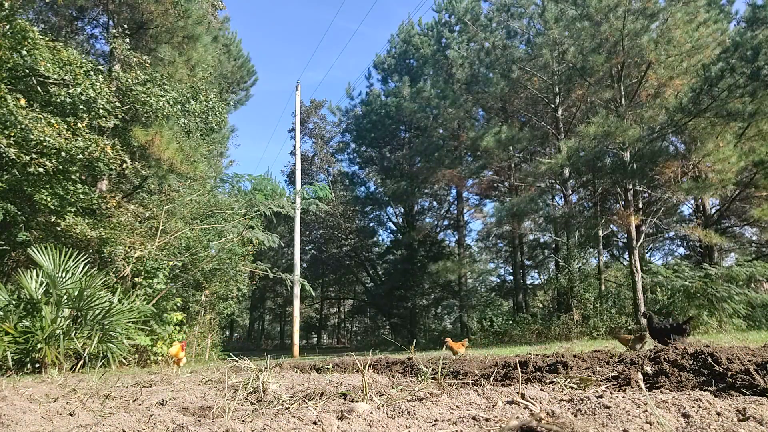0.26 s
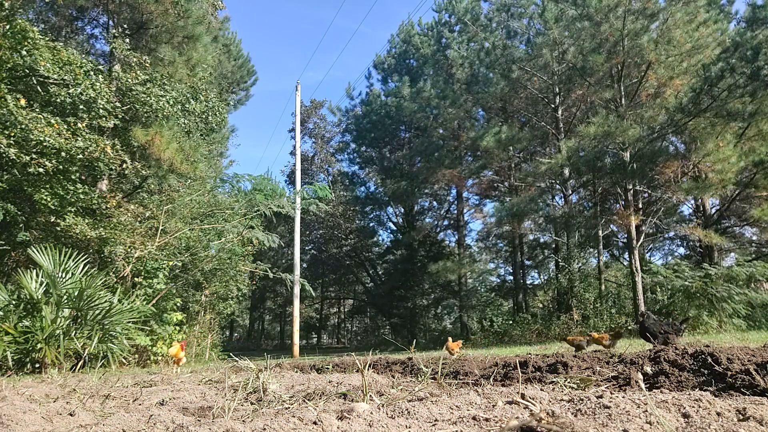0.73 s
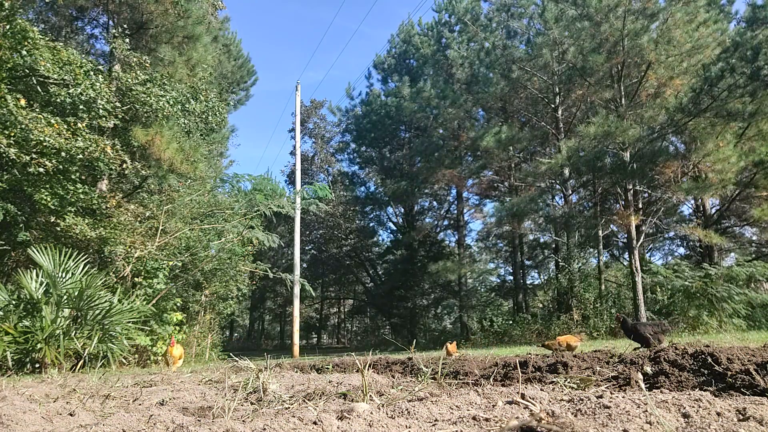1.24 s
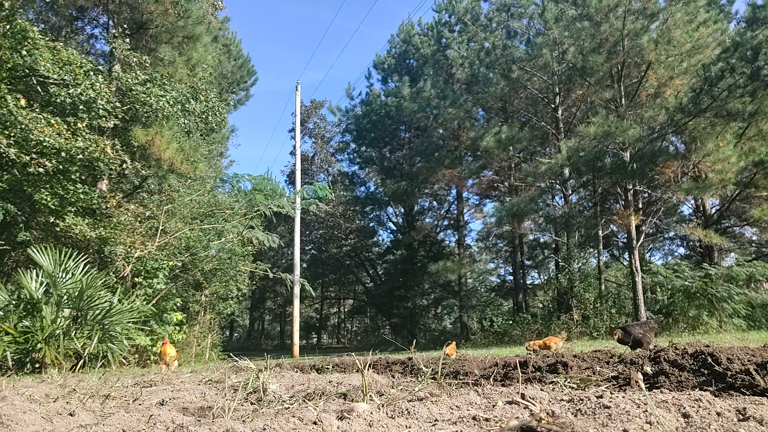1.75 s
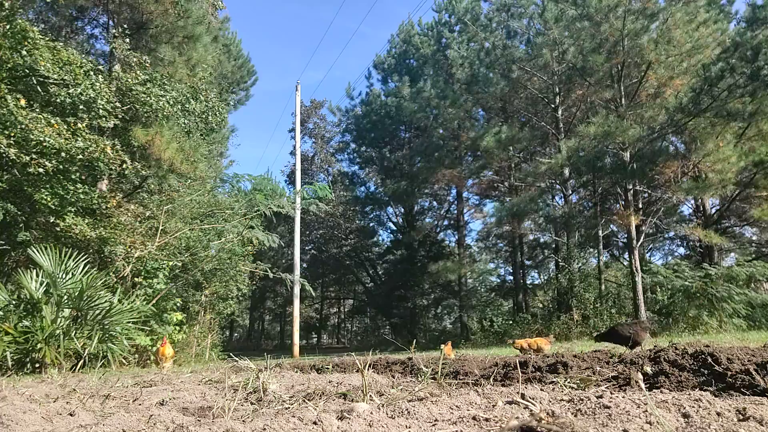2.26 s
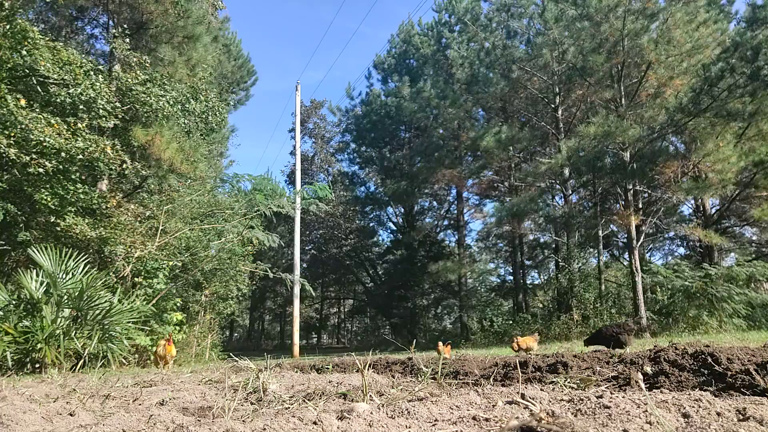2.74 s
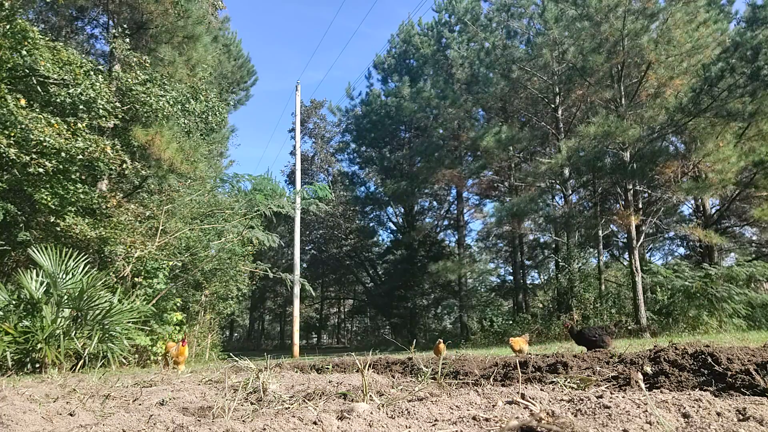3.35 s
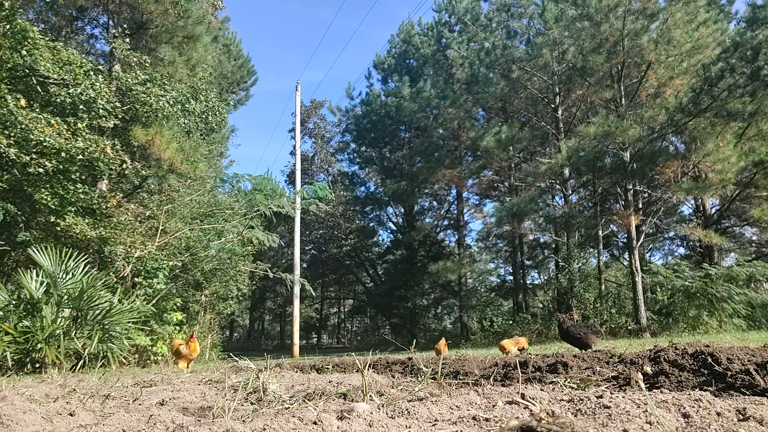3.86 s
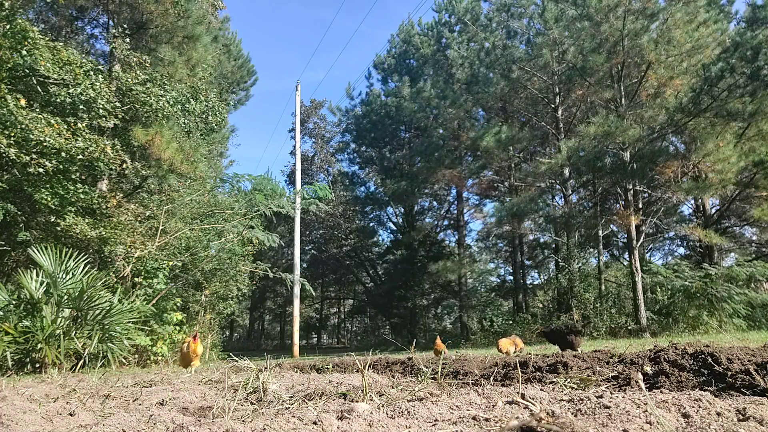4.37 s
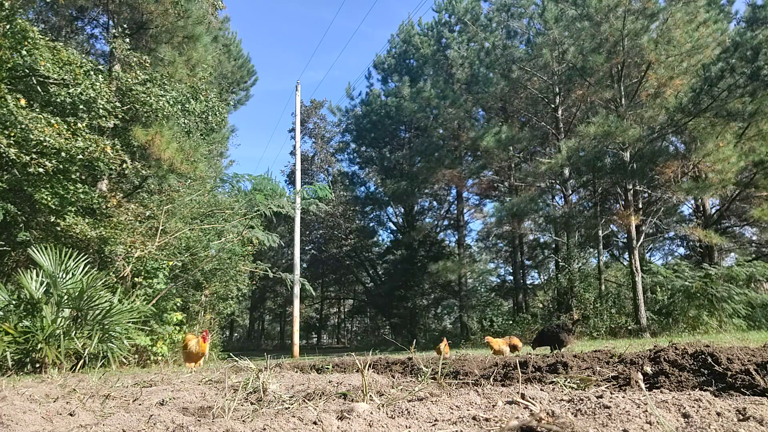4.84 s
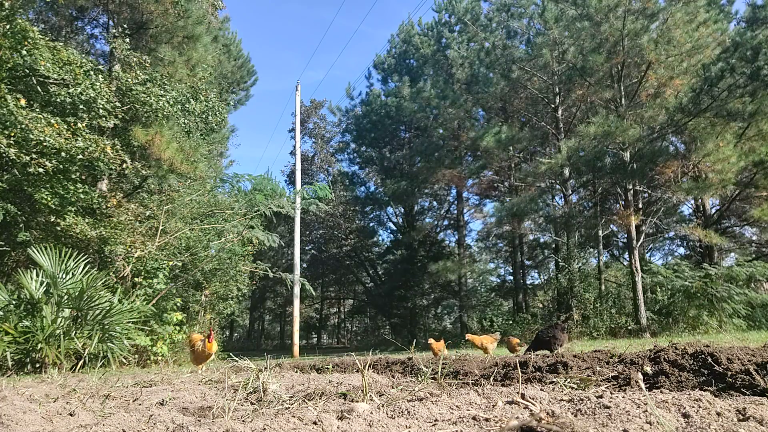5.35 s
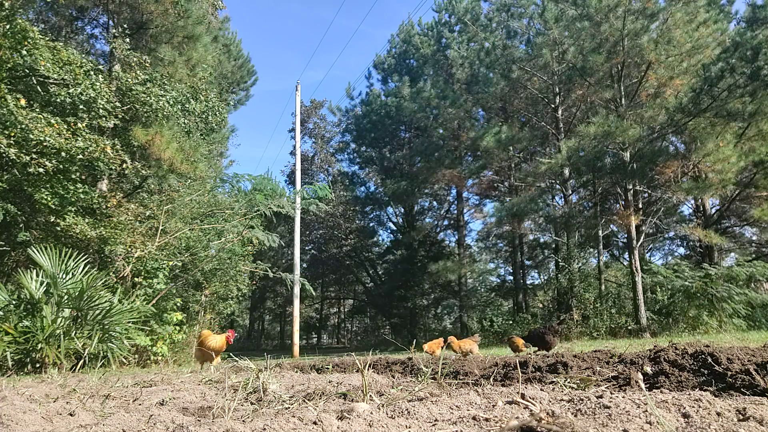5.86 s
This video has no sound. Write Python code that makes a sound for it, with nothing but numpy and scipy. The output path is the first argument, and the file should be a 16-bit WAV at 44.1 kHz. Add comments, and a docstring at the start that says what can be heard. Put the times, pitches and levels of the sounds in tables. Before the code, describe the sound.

A single-cylinder petrol tiller is already running at 0 s, close to a low stereo microphone outdoors. About thirty firings a second make a fast, throaty putter, each thud edged by a spit of bright hiss. Valves tick, the cooling fan rushes briefly, tines grind soil, and loose metal jingles in irregular bursts, strongest around 0.5 and 1.2-1.5 s. The speed hunts slightly up and down, and by 2 s the hiss has eased as the machine moves off. Around 2.95-3.15 s dull tine knocks sound and the muffler swings away: speed rises a little, the note becomes rounder, and hiss drops sharply. From 3.6 to 4.3 s it is darkest, with rattling nearly hidden. Around 4.6 s the engine strains with more throttle, brightness partly returns, and from 5 s it digs in with a fuller, rougher growl, one faint clink near 5.4 s, continuing to 6 s. Treble leans right.

```python
"""Garden tiller turning away, close by

A single-cylinder four-stroke tiller works the soil, heard near the ground on a microphone with two ports.
Each firing sends gas pulses through the muffler as a thud and a spit of hiss; low puffs follow. The valves tick,
the fan rushes, the tines churn and loose metal jingles. The speed hunts as the machine moves off; at about three
seconds tines knock and the muffler swings away: the note turns rounder, the hiss sinks, then the engine digs in."""
import sys
import numpy as np
from scipy import signal
from scipy.fft import rfft, irfft
from scipy.io import wavfile
from scipy.ndimage import uniform_filter1d

SR = 44100
rng = np.random.default_rng(int(sys.argv[2]) if len(sys.argv) > 2 else 0)


def generate_wav(sig):
    """Save sig (samples, or channels by samples) to the path in sys.argv[1] as 16-bit PCM at SR."""
    pcm = np.round(np.clip(np.atleast_2d(sig).T, -1, 1) * 32767).astype(np.int16)
    wavfile.write(sys.argv[1], SR, pcm)


N = 269010
TIME = np.arange(N) / SR  # s
BINS = np.fft.rfftfreq(N, 1 / SR)  # Hz

# Engine speed, hunting round the governor's setting until the turn frees the tines: time_s, firings_per_s
SPEED = [(0.0, 30.468), (0.49, 30.605), (0.66, 31.112), (0.91, 29.959), (1.23, 31.427), (1.53, 29.999),
         (1.9, 31.703), (2.24, 30.283), (2.41, 31.407), (2.71, 30.423), (3.04, 33.036), (3.1, 32.769),
         (4.21, 32.167), (4.64, 32.265), (5.06, 31.817), (5.3, 32.536), (5.7, 32.601), (6.1, 32.43)]
# How far the muffler faces the microphone: time_s, share_0_to_1
FACING = [(0, 0.97), (1.8, 0.93), (2.85, 0.85), (3.12, 0.14)]
# How far the machine has moved off along the row: time_s, share_0_to_1
RETREAT = [(0, 0.02), (1.0, 0.26), (1.73, 0.53), (1.95, 0.95), (2.85, 1)]
# How much the machine's body hides its bright parts in the turn: time_s, share (1 = hidden, briefly above)
SHADE = [(3.0, 0), (3.38, 0.3), (3.62, .88), (3.92, 1), (4.12, 1.08), (4.3, 0.69), (4.7, 0.32), (5.3, 0.24),
         (5.45, 0.09)]
# How hard the tines bite once the machine has turned: time_s, share_0_to_1
LOAD = [(4.0, 0.4), (4.6, 0.24), (5.0, 0.78), (6.1, 0.88)]

# Level of each part close by, and its change at the full value of each control:
# near_db, retreat_db, turn_db, shade_db, load_db, throttle_db
THUD_LEVEL = dict(near_db=-26, retreat_db=-1.63, turn_db=-2.6, shade_db=0.95, load_db=2.9, throttle_db=0.15)
JET_LEVEL = dict(near_db=-21.5, retreat_db=-10.5, turn_db=-13, shade_db=-13, load_db=3, throttle_db=2.5)
CHURN_LEVEL = dict(near_db=-32, retreat_db=-2.5, turn_db=-6.5, shade_db=-5.5, load_db=-0.5, throttle_db=0)
TICK_LEVEL = dict(near_db=-39, retreat_db=-1, turn_db=-16, shade_db=-7, load_db=6.5, throttle_db=5)
RATTLE_LEVEL = dict(near_db=-30, retreat_db=-1.5, turn_db=-2.5, shade_db=-22, load_db=-1, throttle_db=0)

# Exhaust note in front of the muffler, behind it, and behind it under load: multiple_of_firing_rate, level_db
NOTE_FRONT = [(1, -70), (2, -15), (3, -11.5), (4, -11.5), (5, 0.5), (6, -7.5), (7, -18.5), (8, -6.5),
              (9, -13.5), (10, -22.5), (11, -7), (12, -15), (13, -18.5), (14, -7.5), (15, -16), (16, -22.5),
              (17, -18), (18, -13.5), (19, -24), (20, -25), (21, -22.5), (22, -33), (23, -23), (24, -19),
              (25, -24), (26, -24)]
NOTE_BACK = [(1, -50), (2, -19.5), (3, -8), (4, 0.5), (5, 0.5), (6, -4), (7, -18.5), (8, -13), (9, -6),
             (10, -18.5), (11, -20), (12, -14.5), (13, -27), (14, -10.5), (15, -13), (16, -22), (17, -16),
             (18, -50), (19, -41), (20, -17), (21, -20), (22, -39), (23, -45), (24, -16.5), (25, -38),
             (26, -26)]
NOTE_LOADED = [(1, -41), (2, -17.5), (3, -9), (4, -2.5), (5, 0), (6, -1.5), (7, -9), (8, -2), (9, -7.5),
               (10, -8), (11, -9.5), (12, -12.5), (13, -13.5), (14, -12), (15, -16), (16, -17), (17, -19.5),
               (18, -20), (19, -11.5), (20, -17), (21, -14), (22, -24), (23, -63), (24, -42), (25, -64),
               (26, -53)]
# Gas pulses of one cycle (blowdown, piston push, intake gulp): place_in_cycle_0_to_1, strength (negative = suction)
STROKES_FRONT = [(.005, 0.8), (.345, 1.04), (0.667, -0.97)]
# The same behind the muffler, where suction leads: place_in_cycle_0_to_1, strength (negative = suction)
STROKES_BACK = [(.06, -0.838), (.375, 0.798), (.43, .48)]
# Colour of the low turbulence: pitch_hz, density_db (per Hz, relative)
PUFF_COLOUR = [(25, -26), (75, -9), (150, -11), (260, 7.5), (420, -2.5), (650, 0.5), (1000, -8),
               (3000, -28)]
# Colour of the hiss facing the muffler, and of the hiss that bends round the turned machine:
# pitch_hz, density_db (per Hz, relative)
JET_FRONT_COLOUR = [(500, -25), (1100, -22), (2000, -8.5), (2900, -8.5), (3500, -14), (4700, -12.5),
                    (6000, -2), (7700, -10), (8700, 4.5), (10000, 1.5), (11000, 1), (13600, 0), (15000, -1),
                    (15800, -9)]
JET_BACK_COLOUR = [(500, -20), (1100, -13.5), (2200, -11), (3500, -19), (4900, -39), (6100, 1), (7500, 2.5),
                   (9400, 3), (13000, 4.5), (15800, -2)]
# Valve gear and piston knocks: place_in_cycle_0_to_1, level_db (relative)
TAPS = [(.065, 5), (.135, -2), (.225, 1), (0.721, 2.5)]
# Resonances of the engine block: pitch_hz, width_hz, level_db (relative)
BLOCK_MODES = [(2838, 190, 4), (2220, 200, -1), (3220, 300, -26.5), (6240, 270, -1.5), (7570, 290, 8)]
# Rush of the cooling fan, fading as the machine moves off and faintly back near the end: time_s, level_db
FAN_LEVEL = [(0, -36.5), (.6, -38), (1.2, -54), (2, -64), (4.2, -60), (5.2, -49.5), (6.1, -53)]
# Colour of the fan's rush: pitch_hz, density_db (per Hz, relative)
FAN_COLOUR = [(500, -4.5), (1200, -12), (1900, 12.5), (3000, -1.5), (4500, -15), (6500, -20), (10000, -20)]
# Colour of the churning before and after the turn: pitch_hz, density_db (per Hz, relative)
CHURN_FRONT_COLOUR = [(30, -33), (80, -22), (150, -5), (270, 1), (490, -6), (620, 2.5), (780, 2), (950, -1),
                      (1300, -4.5), (2000, -11.5), (2800, -15.5), (3600, -21), (6000, -15), (15000, -16.5)]
CHURN_BACK_COLOUR = [(30, -16), (70, -11), (150, 2.5), (300, -9), (490, -2), (620, -1.5), (770, -1),
                     (900, -5.5), (1300, -7), (2000, -14.5), (3600, -28.5), (6000, -19), (15000, -24)]
# Fits of shaking that set the loose metal jingling, and lulls between them: middle_s, length_s, change_db
BOUTS = [(0.042, 0.24, 1), (0.535, 0.27, 4.5), (.87, 0.39, -2.5), (1.236, 0.24, 8), (1.484, 0.19, 6),
         (1.683, 0.14, -3), (2.331, 0.45, 2)]
# Loudest clinks of loose metal: start_s, level_db (before the common offset clink_db)
CLINKS = [(0.066, -18), (0.394, -20), (0.667, -18), (0.725, -15.5), (0.893, -17), (1.087, -20),
          (1.312, -23), (1.442, -14), (1.768, -29), (1.827, -24), (1.927, -17), (2.007, -22),
          (2.151, -18.5), (2.424, -24), (2.59, -18), (2.845, -19), (2.955, -20), (5.405, -24.5)]
# Resonances of the loose metal: pitch_hz, width_hz, level_db (relative)
METAL_MODES = [(9100, 510, -3.5), (9500, 130, -0.5), (10090, 33, -1.5), (11320, 150, 4.5),
               (12400, 77, -2.5), (13700, 190, 2)]
# Colour of the rattling: pitch_hz, density_db (per Hz, relative)
RATTLE_COLOUR = [(1500, -23), (3500, -12.5), (5000, -47), (6200, -6.5), (8200, 4.5), (8900, -9.5),
                 (10200, 11), (10700, 1.5), (11600, 6), (13500, 6.5), (14600, -11), (15800, -5.5)]
# Dull knocks of the tines on clods: start_s, level_db, pitch_hz, decay_s
KNOCKS = [(2.957, -26, 744, .02), (2.957, -27, 1300, 0.011), (3.012, -33, 900, 0.011),
          (3.148, -25, 230, 0.014)]

# The microphone's left port against the right: pitch_hz, left_minus_right_db
PORT_BALANCE = [(200, .4), (800, .4), (1800, 2), (2750, 4), (4200, 0.6), (6400, -4.5), (8200, -10),
                (9400, -15), (10500, -23), (13000, -22), (15500, -21)]
# How alike the noise is at the two ports: pitch_hz, likeness_0_to_1
PORT_LIKENESS = [(100, 0.68), (700, 0.99), (1500, 0.83), (2800, 0.83), (4500, 0.47), (7000, 1),
                 (12000, 0.24), (16000, .5)]
# How much later the left port hears the machine: pitch_hz, delay_ms
PORT_DELAY = [(350, 0.27), (700, 0.3), (1200, 0.25), (1700, 0.27), (2200, 0.26), (2800, 0.29),
              (4200, 0.371), (5000, 0.292), (8000, 0.313), (12000, 0.384)]

START_CYCLE = -.625  # place in the engine cycle at the start
FULL_THROTTLE = 9.6  # gain in speed that takes full throttle (firings per s, each second)
# The tines bog down in firm soil and the governor holds the throttle open: middle (s), length (s), extra throttle
BOG_S, BOG_LENGTH_S, BOG_THROTTLE = 4.66, 0.81, 1.6
# One thin ring of the metal: level over the jingle (dB), change moved off and turned (dB), dB per dB of shaking
RING_HZ = 13610
RING_DB, RING_RETREAT_DB, RING_TURN_DB, RING_GROWTH = -8.5, -4, -18, .4
EDGE_HZ = 15850  # upper band limit


def amp(db):
    """Decibels to gain."""
    return 10 ** (np.asarray(db) / 20)


def evened(x):
    """Scaled to an rms of 1."""
    return x / np.sqrt(np.mean(x ** 2) + 1e-20)


def curve(rows):
    """A table of time and value, read at every sample."""
    return np.interp(TIME, *np.transpose(rows))


def spectrum(points):
    """A table of pitch and value, read at every frequency bin along a log scale."""
    hz, value = np.transpose(points)
    return np.interp(np.log(BINS + 1), np.log(hz + 1), value)


def modes(rows):
    """Frequency response of a few damped resonances."""
    return sum(amp(db) / (1 + 2j * (BINS - hz) / width) for hz, width, db in rows)


def noise(response):
    """Coloured noise at both ports, whose likeness depends on pitch."""
    shared, other = rng.standard_normal((2, len(BINS))) + 1j * rng.standard_normal((2, len(BINS)))
    like = np.clip(spectrum(PORT_LIKENESS), 0, 1)
    second = like * shared + np.sqrt(1 - like ** 2) * other
    return evened(irfft(np.array([shared, second]) * response, N))


def per_cycle(cycle):
    """One normal random number for each engine cycle."""
    return rng.standard_normal(512)[np.floor(cycle).astype(int) + 2]


def burst(age, rise, decay):
    """An envelope that swells quickly and dies away; all three in the same unit."""
    age = np.maximum(age, 0)
    return (1 - np.exp(-age / rise)) * np.exp(-age / decay)


def swell(middle_s, length_s):
    """A smooth rise and fall around one moment."""
    return np.exp(-(2 * (TIME - middle_s) / length_s) ** 2)


def level(near_db, retreat_db, turn_db, shade_db, load_db, throttle_db):
    """Gain of one part as the machine moves off, turns, hides it, digs in and opens its throttle."""
    acceleration = uniform_filter1d(np.gradient(curve(SPEED)) * SR, size=5200)
    throttle = acceleration / FULL_THROTTLE * curve(FACING) + BOG_THROTTLE * swell(BOG_S, BOG_LENGTH_S)
    place_db = retreat_db * curve(RETREAT) + turn_db * (1 - curve(FACING)) + shade_db * curve(SHADE)
    return amp(near_db + place_db + load_db * curve(LOAD) + throttle_db * throttle)


def pipe_db(hz, centre_hz=258, width_hz=17, peak_db=9):
    """The exhaust pipe booms whenever a harmonic drifts onto its resonance."""
    return peak_db * np.exp(-((hz - centre_hz) / width_hz) ** 2)


def ground_db(hz, centre_hz=254, width_hz=4, depth_db=-11):
    """Behind the machine the ground echo weakens a harmonic that sags onto its notch."""
    return depth_db * np.exp(-((hz - centre_hz) / width_hz) ** 2)


def stroke_phase(strokes, k, muffler_hz, width_hz, direct):
    """Phase of harmonic k as gas pulses escape partly straight out, partly through the muffler's resonance."""
    place, strength = np.transpose(strokes)
    hz = k * np.mean(np.transpose(SPEED)[1])
    muffler = direct + 1 / (1 + 1j * (hz ** 2 - muffler_hz ** 2) / (hz * width_hz))
    pulses = np.sum(strength * np.exp(-2j * np.pi * k * place))
    return np.exp(1j * np.angle(muffler * pulses))


def exhaust(cycle, facing, shake=0.0073, drift=0.038, smear=0.0606):
    """Three gas pulses a cycle ring the muffler; higher harmonics vary most from cycle to cycle."""
    load, speed = np.clip(curve(LOAD), 0, 1), curve(SPEED)
    usual_speed = np.average(speed, weights=facing)
    cycle_marks, note = np.arange(-2, 254), np.zeros(N)
    for k, (front, back, loaded) in enumerate(zip(NOTE_FRONT, NOTE_BACK, NOTE_LOADED), 1):
        boom_db = pipe_db(k * speed) - pipe_db(k * usual_speed)
        ahead = amp(front[1] + boom_db)
        ahead = ahead * stroke_phase(STROKES_FRONT, k, muffler_hz=134, width_hz=96, direct=0.093)
        behind = (1 - load) * amp(back[1]) + load * amp(loaded[1])
        behind = behind * stroke_phase(STROKES_BACK, k, muffler_hz=165.5, width_hz=35, direct=0.046)
        behind *= amp(ground_db(k * speed))
        # upper harmonics arrive by roundabout paths
        behind *= np.exp(-1j * np.pi * smear * max(k - 12, 0) ** 2)
        a, b, c = rng.standard_normal((3, len(cycle_marks)))
        slow = drift * min(k / 10, 1) * evened(uniform_filter1d(c, size=14))
        uneven = np.interp(cycle, cycle_marks, 1 + slow + shake * k * (a + 1j * b))
        mixed = facing * ahead + (1 - facing) * behind
        note += (mixed * uneven * np.exp(2j * np.pi * k * cycle)).real
    # even out the running power, so that the level table alone sets the loudness
    power = uniform_filter1d(uniform_filter1d(note ** 2, size=4200), size=2800)
    return note / np.sqrt(power) * level(**THUD_LEVEL)


def puffs(cycle, under_thud_db=-13, steady=0.51):
    """Low turbulence follows each outward gas pulse; rise and decay are in cycles."""
    gate = steady + sum(burst((cycle - place + 0.053) % 1, 0.043, 0.12)
                        for place, strength in STROKES_FRONT if strength > 0)
    return evened(noise(amp(spectrum(PUFF_COLOUR))) * gate) * level(**THUD_LEVEL) * amp(under_thud_db)


def jet(cycle, facing, rise=0.033, decay=0.098, push_place=0.15, push=0.34):
    """Gas spits out as the exhaust valve opens and again as the piston pushes; times are in cycles."""
    spit = burst(cycle % 1, rise, decay) + push * burst(cycle % 1 - push_place, rise, decay / 2)
    uneven_db = 1.2 * np.clip(per_cycle(cycle), -1.5, 1.5)
    gate = spit * amp(uneven_db)
    ahead = np.sqrt(facing) * noise(amp(spectrum(JET_FRONT_COLOUR)))
    behind = np.sqrt(1 - facing) * noise(amp(spectrum(JET_BACK_COLOUR)))
    return (ahead + behind) * evened(gate) * level(**JET_LEVEL)


def valves(cycle, uneven_db=0.8, decay=0.057):
    """Short knocks at fixed crank angles ring the engine block; decay is in cycles."""
    gate = 0
    for place, db in TAPS:
        strength = amp(db + uneven_db * per_cycle(cycle - place))
        gate = gate + strength * np.exp(-((cycle - place) % 1) / decay)
    ring = irfft(rfft(noise(1) * gate) * modes(BLOCK_MODES), N)
    return evened(ring) * level(**TICK_LEVEL)


def fan():
    """Air rushes over the cooling fins."""
    return noise(amp(spectrum(FAN_COLOUR))) * amp(curve(FAN_LEVEL))


def churn(cycle, facing, front_db=2, back_db=3, lumpy_db=1.7, throb=0.18):
    """Tines and gears grind through the soil in uneven lumps, shaken by each firing."""
    lumps = evened(uniform_filter1d(rng.standard_normal(N), size=400))
    gate = evened(amp(lumpy_db * lumps) * (1 + throb * np.exp(-(cycle % 1) / 0.18)))
    ahead = np.sqrt(facing) * amp(front_db) * noise(amp(spectrum(CHURN_FRONT_COLOUR)))
    behind = np.sqrt(1 - facing) * amp(back_db) * noise(amp(spectrum(CHURN_BACK_COLOUR)))
    return (ahead + behind) * gate * level(**CHURN_LEVEL)


def rattle(cycle, facing, throb=0.16, throb_place=0.59, per_s=110, spread_db=4, rise_s=0.0037, decay_s=0.0018,
           clink_db=1.5, metal_db=-7, near_wash=0.11, far_wash=0.73, strays_per_s=5, stray_db=-24):
    """Loose metal chatters in short bright clinks, which merge into a sizzle when the machine is turned away."""
    shaking_db = sum(db * swell(middle_s, length_s) for middle_s, length_s, db in BOUTS)
    blows = (rng.random(N) < per_s / SR) * amp(spread_db * np.clip(rng.standard_normal(N), -2, 1.5))
    shape = burst(TIME[:2000], rise_s, decay_s) ** 2
    chatter = np.abs(signal.oaconvolve(blows ** 2, shape)[:N])
    wash = np.clip(facing * near_wash + (1 - facing) * far_wash, 0, 1)
    power = wash + (1 - wash) * chatter / chatter.mean()
    power *= (level(**RATTLE_LEVEL) * amp(shaking_db)) ** 2
    # shaken by each turn of the crank, two to a cycle
    power *= 1 + np.clip(throb, 0, 1) * np.cos(4 * np.pi * (cycle - throb_place))
    loud = (rng.random(N) < strays_per_s / SR) * (facing ** 2 * amp(stray_db)) ** 2
    for start_s, db in CLINKS:
        loud[round(start_s * SR)] = amp(db + clink_db) ** 2
    power += np.abs(signal.oaconvolve(loud, shape / shape.max())[:N])
    # resonances outlast the blows
    ringing = signal.lfilter([1], [1, -np.exp(-1 / (0.0081 * SR))], power) / (0.004 * SR)
    flicker_db = 3 * evened(uniform_filter1d(rng.standard_normal(N), size=3000))
    place_db = RING_RETREAT_DB * curve(RETREAT) + RING_TURN_DB * (1 - facing)
    ring_gain = amp(RING_DB + flicker_db + place_db + RING_GROWTH * shaking_db)
    thin_ring = ring_gain * noise(modes([(RING_HZ, 90, 0)]) ** 2)
    tones = amp(metal_db) * noise(modes(METAL_MODES)) + thin_ring
    return np.sqrt(power) * noise(amp(spectrum(RATTLE_COLOUR))) + np.sqrt(ringing) * tones


def knocks(rise_s=0.0017, width_hz=160):
    """A tine strikes a clod and the hood gives a short, rough ring."""
    return sum(amp(db) * burst(TIME - start_s, rise_s, decay_s) * noise(modes([(hz, width_hz, 0)]) ** 2)
               for start_s, db, hz, decay_s in KNOCKS)


def scene():
    """The engine cycle times the exhaust, valves, churning and rattle; fan and knocks are added."""
    cycle = START_CYCLE + np.cumsum(curve(SPEED)) / SR
    facing = np.clip(curve(FACING), 0, 1)
    engine = exhaust(cycle, facing) + puffs(cycle) + jet(cycle, facing) + valves(cycle) + fan()
    return engine + churn(cycle, facing) + rattle(cycle, facing) + knocks()


def record(dry):
    """The left port lies farther from the machine, shaded from its treble; then the band limit."""
    tilt = amp(spectrum(PORT_BALANCE))
    port_gains = np.array([tilt, np.ones(len(BINS))]) * np.sqrt(2 / (1 + tilt ** 2))
    # half the delay on the left, half as an advance on the right
    half_lag = np.exp(-1j * np.pi * BINS * spectrum(PORT_DELAY) / 1000)
    heard = irfft(rfft(dry) * port_gains * np.array([half_lag, half_lag.conj()]), N)
    band_limit = signal.firwin(401, EDGE_HZ, window=("kaiser", 9), fs=SR)
    return signal.oaconvolve(heard, band_limit[None], "same")


dry = scene()
out = record(dry)
generate_wav(out)
```